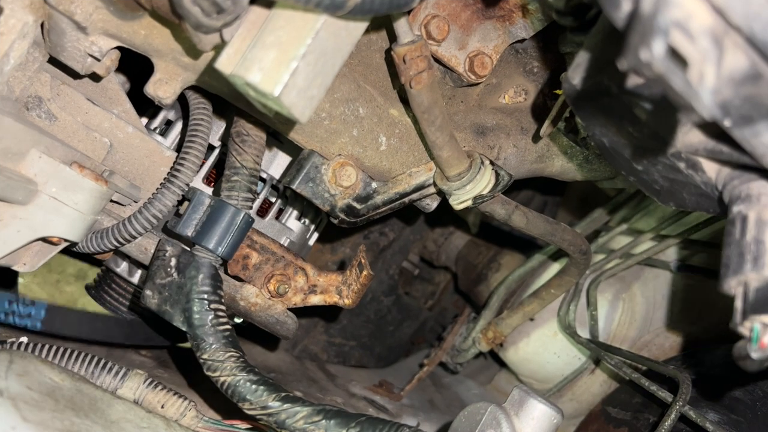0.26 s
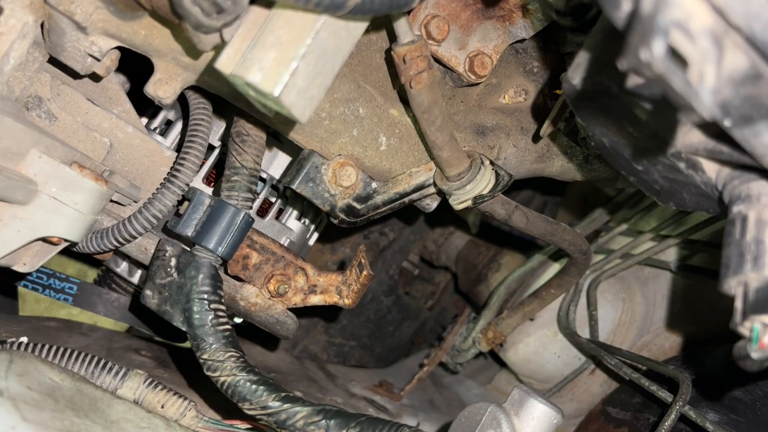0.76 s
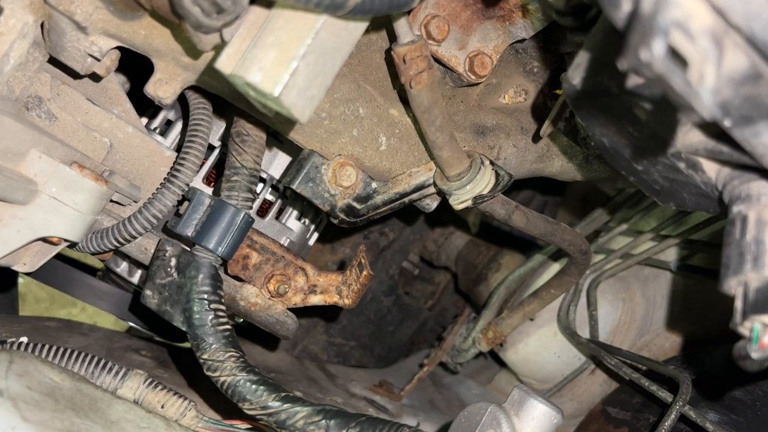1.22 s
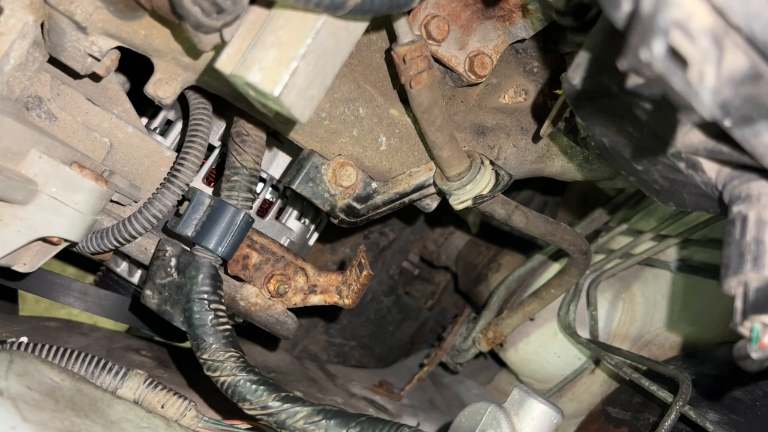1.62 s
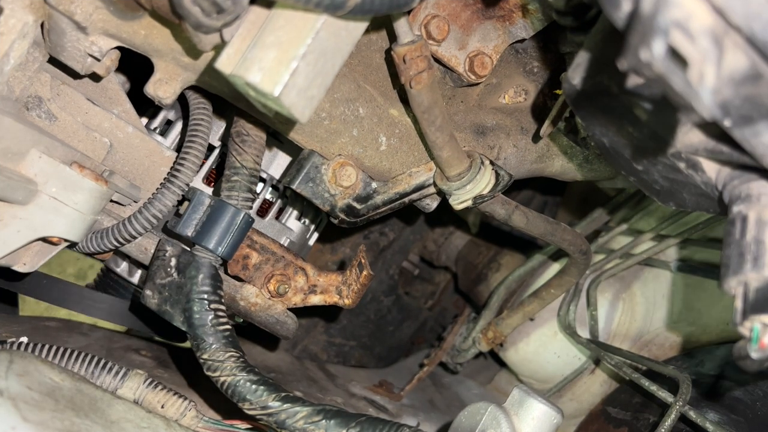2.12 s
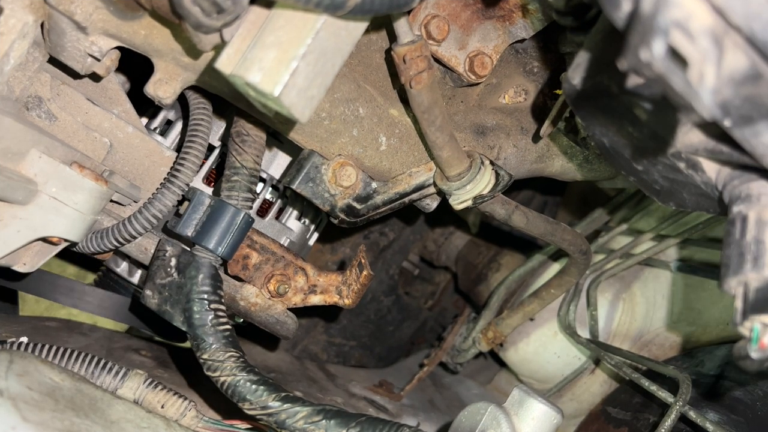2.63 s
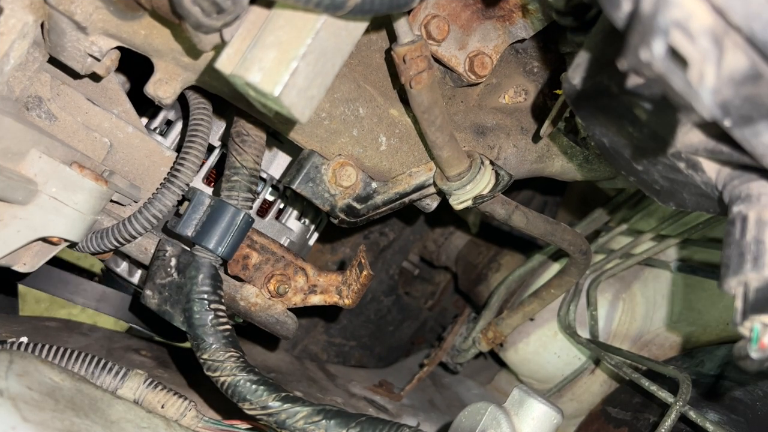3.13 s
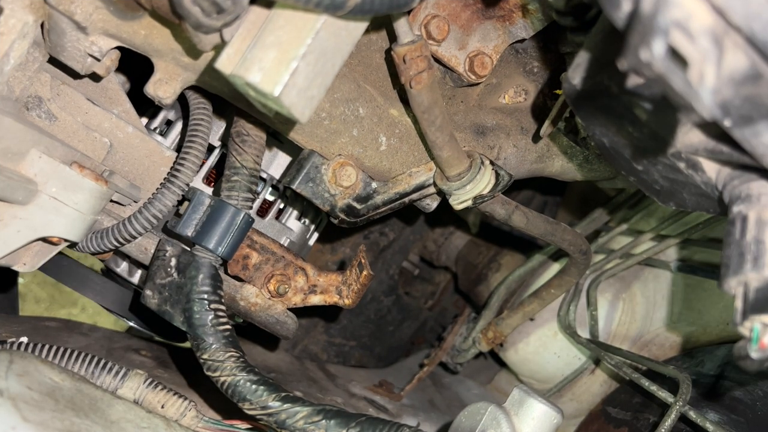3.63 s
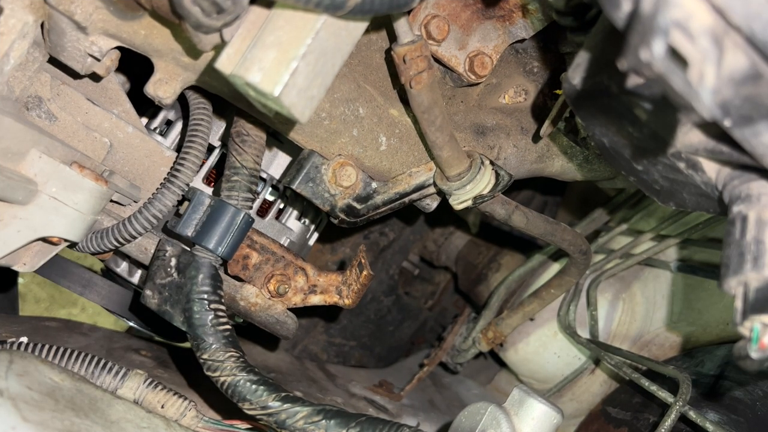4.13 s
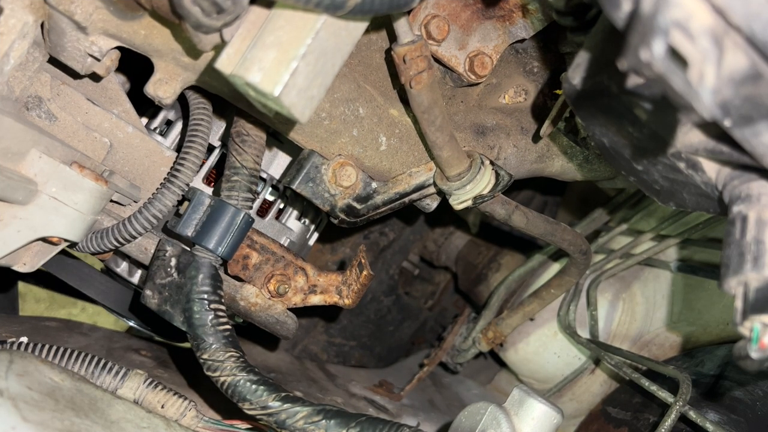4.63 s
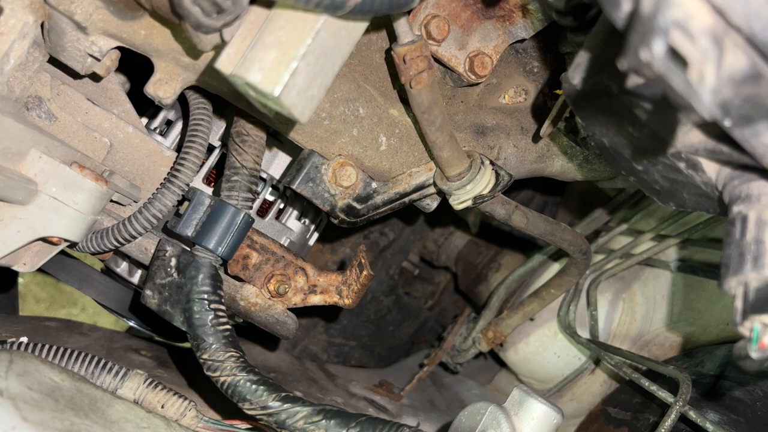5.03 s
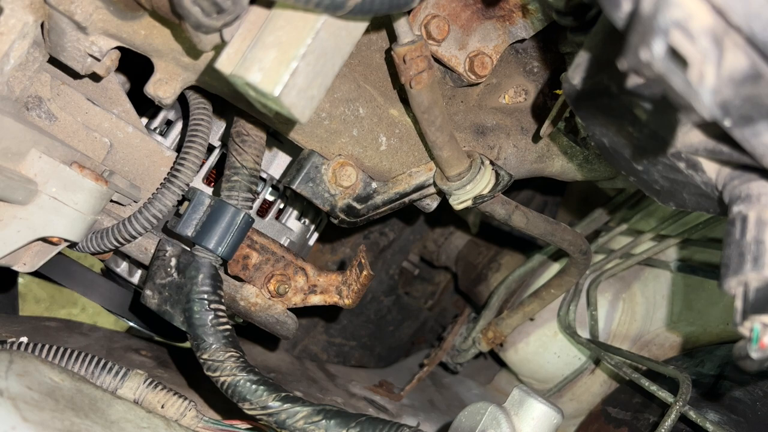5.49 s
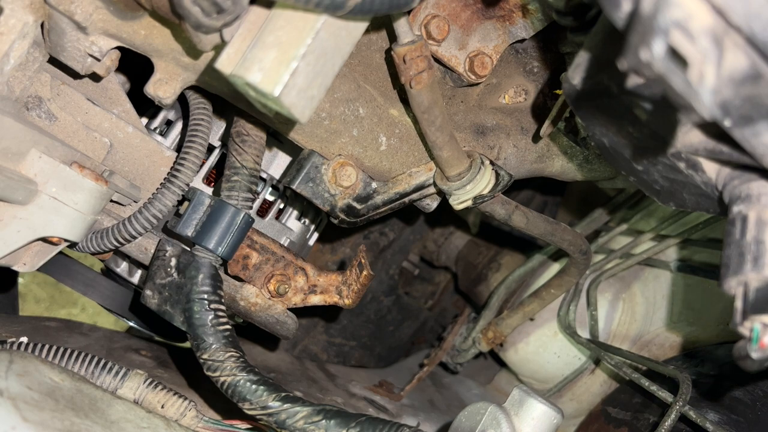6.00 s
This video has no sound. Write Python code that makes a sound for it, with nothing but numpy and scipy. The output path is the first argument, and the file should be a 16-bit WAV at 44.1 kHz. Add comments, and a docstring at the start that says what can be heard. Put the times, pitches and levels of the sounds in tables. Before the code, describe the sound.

A quiet garage with a faint low hum, heard closely in stereo within a cramped engine bay. At 0 s a dull bump and dry rubber hiss begin; around 0.15 s there is a short rasping scrape with small knocks. At 0.7 s a hard knock and click leave a brief thin metallic ping. From 0.9 to 1.45 s rubber rubs, judders and scrapes, ending in another ping. Soft sliding and limp thuds follow around 1.8-2.4 s. A stronger judder builds from 2.55 s into a hollow slap at 2.8 s. At 3.25-3.4 s come clustered rasps, clicks and a loud double slap. Another judder and scrape run from 3.7 to 3.95 s. The sharpest, loudest knock cracks at 4.43 s, with a weaker slap just after. Small judders and taps continue until 5.4 s, then only faint rustling and hum remain to about 6.3 s.

```python
"""First comes a dull bump with a dry hiss of rubber, over the low hum of a quiet garage.
A drive belt is being worked by hand onto its pulleys in an engine bay, heard at two microphone ports.
Irregular tiny slips make the belt hiss, judder, scrape and rasp; short pushes make it knock and slap.
Most contacts ring through one bank of damped resonances, the cramped bay; hoses and arms only thud.
Bright scatter from nearby metal and a faint garage tail follow the work."""
import sys
import numpy as np
from scipy import signal
from scipy.fft import rfft, irfft, next_fast_len
from scipy.io import wavfile

SR = 44100
rng = np.random.default_rng(int(sys.argv[2]) if len(sys.argv) > 2 else 0)


def digitize_waveform(pressure):
    """Quantize a signal to 16-bit integers and store it at the path in sys.argv[1].

    Rows of a 2-D input are taken as channels; values are limited to [-1, 1].
    """
    field = np.atleast_2d(pressure).T
    bounded = np.clip(field, -1, 1)
    quanta = np.round(bounded * 32767).astype(np.int16)
    wavfile.write(sys.argv[1], SR, quanta)


N = 275713
TIME = np.arange(N) / SR
GESTURE_TIME = TIME[:SR]   # no hand movement outlasts a second


def from_db(db):
    """Decibels to gain."""
    return 10 ** (np.asarray(db) / 20)


def rms_one(x):
    """Scale to unit power."""
    return x / np.sqrt(np.mean(x ** 2) + 1e-20)


def peak_one(x):
    """Scale to unit peak."""
    return x / np.abs(x).max()


def level(curve):
    """Gain over time from (t/s, level/dB) rows."""
    return from_db(np.interp(TIME, *np.transpose(curve)))


def at_hz(points, hz, axis=1):
    """Read one column of a table on a log-frequency axis."""
    points = np.array(points)
    return np.interp(np.log(np.maximum(hz, 1)), np.log(points[:, 0]), points[:, axis])


def colour(x, spectrum):
    """Give a steady signal a spectrum; unit power."""
    size = next_fast_len(x.shape[-1])
    hz = np.fft.rfftfreq(size, 1 / SR)
    shaped = irfft(rfft(x, size) * from_db(at_hz(spectrum, hz)), size)
    return rms_one(shaped[..., :x.shape[-1]])


def band(x, low_hz, high_hz):
    """Causal band-pass."""
    edges = [low_hz, min(high_hz, .45 * SR)]
    return signal.sosfilt(signal.butter(2, edges, "band", fs=SR, output="sos"), x)


def drift(rate):
    """Random wandering with a spread near one, with this many new values per second."""
    return np.interp(TIME * rate, np.arange(4096), rng.standard_normal(4096))


def slips(per_s, spread_db, size=N):
    """Tiny stick-slip releases at random moments, of uneven size and either sign; unit power."""
    unevenness = np.minimum(rng.exponential(1, size), 4)
    sizes = from_db(spread_db * unevenness) * rng.choice([-1, 1], size)
    return rms_one(sizes * (rng.random(size) < per_s / SR))


def add(track, s, sound):
    """Mix a short sound in at a time."""
    start = max(int(s * SR), 0)
    track[..., start:start + sound.shape[-1]] += sound[..., :N - start]


def gesture(length, attack_s, release_s):
    """Gain of one hand movement: a smooth attack, a hold and a dying release."""
    rise = np.sin(np.pi / 2 * np.minimum(GESTURE_TIME / attack_s, 1)) ** 2
    return rise * np.exp(-np.maximum(GESTURE_TIME - length, 0) / release_s)


def together(movements):
    """Gain over time from (start, gain) pairs; overlapping movements add in power."""
    power = np.zeros(N)
    for s, gain in movements:
        add(power, s, gain ** 2)
    return np.sqrt(power)


# the garage at rest, spectrum of its hum: f/Hz, relative level/dB
ROOM_COLOUR = [(20, -36), (35, -17), (50, -2.5), (75, -2.5), (110, -7.5), (180, -14.5), (300, -23.5),
               (600, -29.5), (2200, -38), (3000, -47), (8500, -58)]


def room_tone(hum_db=-61.5):
    """Low hum of the building, alike at both ports; its faint top is diffuse."""
    mid, side = from_db(hum_db) * colour(rng.standard_normal((2, N)), ROOM_COLOUR)
    return mid + band(side, 440, 16600) * [[.5], [-.5]]


# the garage's reverberation: f/Hz, time to die by 60 dB t60/s
GARAGE_DECAY = [(150, 0.47), (600, 0.15), (2000, 0.24), (6000, 0.2), (14000, 0.15)]


def reflections(x, near_db=-3.0, near_t60=0.026, near_low_hz=1300, far_db=-10.0, far_low_db=-4.5):
    """Bright scatter from nearby metal, then the garage's faint tail dying band by band."""
    t = TIME[:SR // 2]
    shared, left, right = rng.standard_normal((3, len(t)))
    scatter = band(shared + np.array([left, right]), near_low_hz, 15000)
    near = scatter * from_db(-60 * t / near_t60) * (t > .001)
    far, edges = 0, np.geomspace(80, 16000, 8)
    for low, high in zip(edges, edges[1:]):
        hz = np.sqrt(low * high)
        gain = from_db(far_low_db * (hz < 800) - 60 * t / at_hz(GARAGE_DECAY, hz))
        far = far + band(rng.standard_normal((2, len(t))), low, high) * gain * (t > .008)
    response = (from_db(near_db) * rms_one(near) + from_db(far_db) * rms_one(far)) / np.sqrt(len(t))
    return signal.fftconvolve(x, response, axes=1)[:, :N]


def moving_reflections(x, round_s=0.9, count=4):
    """The point of contact wanders, so patterns of reflections fade into one another in a round."""
    total = 0
    for k in range(count):
        share = np.maximum(np.cos(2 * np.pi * (TIME / round_s - k / count)), 0)
        total = total + reflections(x * share)
    return total


# the two microphone ports: f/Hz, left minus right level/dB, left's phase lead/rad
PORTS = [(80, 0, 0), (320, -5.5, -.35), (550, -3.5, -.5), (1100, -1, -1.3), (3000, 1.5, .5), (8000, 0, 1.4)]


def ports(x):
    """Direct sound reaches the two ports with a different level and phase."""
    size = next_fast_len(N + SR // 10)
    hz, side = np.fft.rfftfreq(size, 1 / SR), np.array([[.5], [-.5]])
    lead = np.exp(1j * side * at_hz(PORTS, hz, axis=2))
    response = from_db(side * at_hz(PORTS, hz, axis=1)) * lead
    return irfft(rfft(x, size) * response, size)[:, :N]


# higher ring of pulleys and brackets: f/Hz, width f/Hz, level/dB
METAL = [(1247, 290, -16), (1640, 40, -14), (1980, 73, -20), (2390, 180, -27), (2680, 66, -25),
         (3010, 63, -32.5), (3890, 68, -23), (5390, 67, -24.5), (8170, 720, -22.5)]


def metal(force, spread_db=0):
    """The high ring of the pulleys; each mode swings in a sense drawn at random."""
    sense = rng.choice([-1, 1], len(METAL))
    # at a spread of 0 dB all modes keep their levels
    shares = sense * from_db(spread_db * rng.standard_normal(len(METAL)))
    return sum(share * from_db(db) * resonance(force, hz, width)
               for share, (hz, width, db) in zip(shares, METAL))


def resonance(x, hz, width):
    """One damped mode, gain 1 at its top."""
    r = np.exp(-np.pi * width / SR)
    feedback = [1, -2 * r * np.cos(2 * np.pi * hz / SR), r * r]
    return (1 - r * r) / 2 * signal.lfilter([1, 0, -1], feedback, x)


# low resonances of belt, pulleys and the bay around them: f/Hz, width f/Hz, level/dB
MODES = [(217.5, 77, -14), (319.4, 28, -5.5), (446.3, 58, 2), (533.2, 53.6, 1), (685.2, 36.5, -2.5),
         (800, 66, -7), (944, 150, -7), (1160, 40, -7.5)]


def bay(force, broad_db=-29.5):
    """Neighbouring low modes swing in opposite senses, so a knock swells; the metal rings above them."""
    low = sum((-1) ** k * from_db(db) * resonance(force, hz, width)
              for k, (hz, width, db) in enumerate(MODES))
    # dense modes merge into a broad treble
    return low + metal(force) + from_db(broad_db) * band(force, 1100, 10000)


# hoses and arms bumping: t/s, level/dB
BUMPS = [(0.0, -49), (0.22, -60), (1.794, -51), (2.364, -50.5), (2.429, -52.5), (2.54, -50.5),
         (2.72, -51.5), (3.249, -46), (3.36, -51), (3.86, -66.5), (4.13, -54.5), (4.828, -50)]
# faint shuffling of the arms, which rest for a moment near the end: t/s, level/dB
SHUFFLE = [(0.0, -59.5), (2.9, -62), (5.2, -58.5), (5.33, -66), (5.8, -73), (6.25, -53.5)]
# dull spectrum of both: f/Hz, relative level/dB
BUMP_COLOUR = [(35, -14), (60, 4), (95, 3.5), (150, -5), (230, -5.5), (320, -3), (430, -11), (700, -22.5),
               (1500, -29.5), (6000, -84.5)]


def bumping(attack_s=0.0098, release_s=0.14):
    """Limp hoses and sleeves give dull thuds with no ring."""
    thuds = together((s, from_db(db) * gesture(attack_s, attack_s, release_s)) for s, db in BUMPS)
    return np.hypot(thuds, level(SHUFFLE)) * colour(slips(per_s=450, spread_db=3.5), BUMP_COLOUR)


# light strokes of belt and hands: t/s at the fastest, width t/s at half gain,
# level/dB before the trims of hiss and judder
SLIDES = [(-0, 0.12, -55.5), (0.139, 0.1, -59), (0.313, 0.14, -65.5), (0.442, 0.091, -59),
          (0.59, 0.16, -62.5), (1.208, 0.16, -59), (1.332, 0.085, -53.5), (1.509, 0.077, -61.5),
          (1.793, 0.19, -54), (1.905, 0.11, -54.5), (2.07, 0.17, -56), (2.22, 0.16, -60.5),
          (2.414, 0.085, -61.5), (2.59, 0.1, -56.5), (2.743, 0.12, -59.5), (2.878, 0.15, -63),
          (2.986, 0.1, -55), (3.067, 0.081, -54.5), (3.262, 0.036, -51), (3.395, 0.13, -53),
          (3.536, 0.083, -59), (3.717, 0.2, -59.5), (3.942, 0.072, -60), (4.313, 0.1, -62.5),
          (4.59, 0.044, -63), (4.736, 0.087, -59), (4.91, 0.29, -67.5), (5.095, 0.066, -63),
          (5.252, 0.044, -79), (5.58, 0.04, -61), (5.84, 0.1, -68.5), (5.998, 0.15, -61.5),
          (6.184, 0.11, -62.5)]


def slide_gain(shuffle_db=-72):
    """Each light stroke speeds up and slows down smoothly; the sliding between dies when the arms rest."""
    power = 0
    for s, length, db in SLIDES:
        halvings = np.minimum(2 * (2 * (TIME - s) / length) ** 2, 60)
        power = power + from_db(2 * db) * .5 ** halvings
    shuffle = level(SHUFFLE)
    busy = np.minimum(shuffle / shuffle.mean(), 1)
    return np.hypot(np.sqrt(power), from_db(shuffle_db) * busy ** 2)


# bright spectrum of the sliding rubber: f/Hz, relative level/dB
SLIDE_COLOUR = [(400, 5.5), (1300, -0.5), (2500, 2.5), (4500, 0), (6500, 4), (8900, 6.5), (9700, -2),
                (10500, -111.5)]


def sliding(strokes, trim_db=-0.85, apart=1.0, flutter_db=3.5, fine_db=-0.5, fine_follows=0.88):
    """Surface grain passing under the hands: a dense, bright rustle, finer as the stroke gets faster."""
    shared, left, right = [slips(per_s=8000, spread_db=2.0) for _ in range(3)]
    grain = shared + apart * np.array([left, right])
    # against the rustle, the finest grain drops fine_follows dB for each dB that a stroke is weaker
    fine = from_db(fine_db) * (strokes / strokes.max()) ** fine_follows
    rustle = colour(grain, SLIDE_COLOUR) + fine * rms_one(band(grain, 11000, 14600))
    return from_db(trim_db + flutter_db * drift(rate=47)) * strokes * rustle


# back of the belt dragging evenly over a pulley: t/s, length t/s, level/dB, lowest f/Hz
RUBS = [(0.92, 0.18, -53.5, 624), (1.15, 0.079, -48, 695), (2.63, 0.158, -50, 580)]


def rubbing(top_ratio=1.485, attack_s=0.065, release_s=0.0073, broad_db=-10.5):
    """Dense, even slips over some half an octave, with a weaker broad part that makes the pulley sing."""
    out = np.zeros(N)
    for s, length, db, low_hz in RUBS:
        grain = slips(per_s=6000, spread_db=-2.5, size=len(GESTURE_TIME))
        broad = from_db(broad_db) * band(grain, low_hz, 2440)
        force = band(grain, low_hz, top_ratio * low_hz) + broad
        add(out, s, from_db(db) * gesture(length, attack_s, release_s) * rms_one(bay(force)))
    return out


# belt edge scraping over rims and brackets: t/s, length t/s, body level/dB, treble gain/dB
SCRAPES = [(0.122, 0.034, -39.5, -9), (0.921, 0.35, -61, 14), (1.361, 0.11, -52, 4),
           (3.111, 0.0061, -55, -13), (3.461, 0.085, -54.5, 3.5), (3.85, 0.039, -51.5, 6),
           (3.953, 0.011, -59, 13.5), (4.565, 0.052, -57.5, 14.5), (4.813, 0.013, -55.5, 10.5),
           (5.193, 0.085, -65, 8), (5.458, 0.014, -70.5, 13.5)]
# spectrum of the scraping force: f/Hz, relative level/dB
SCRAPE_COLOUR = [(300, 4.5), (500, -8.5), (750, 0.5), (1100, -7.5), (2000, -6), (3600, -6.5), (5000, -4.5),
                 (12000, -16)]


def scraping(treble_hz=1400, attack_share=0.36, release_s=0.022):
    """Fast hard slips, each pass shaking the bay; a scrape speeds up over a share of its length."""
    out = np.zeros(N)
    lowpass = signal.butter(2, treble_hz, fs=SR, output="sos")
    for s, length, db, treble_db in SCRAPES:
        force = colour(slips(per_s=1200, spread_db=2.5, size=len(GESTURE_TIME)), SCRAPE_COLOUR)
        grit = rms_one(bay(force))
        body = signal.sosfiltfilt(lowpass, grit)
        heard = body + from_db(treble_db) * (grit - body)
        add(out, s, from_db(db) * gesture(length, attack_share * length, release_s) * heard)
    return out


# the belt's ribs rasping over a metal rim: t/s, length t/s, level/dB, crackle's lowest f/Hz, highest f/Hz
RASPS = [(0.134, 0.041, -42, 710, 2500), (1.367, 0.015, -50, 1410, 3300), (3.2772, 0.004, -41, 940, 2450),
         (3.361, 0.01, -46, 1680, 3550), (3.8495, 0.02, -50, 1280, 6230), (3.894, 0.0054, -50.5, 700, 2400)]


def rasping(catches_per_s=230, rough_db=5.0, attack_s=0.0036, release_s=0.0036, ring_db=2.5):
    """Hard slips clump unevenly as rib after rib catches and lets go; they crackle and shake the bay."""
    out = np.zeros(N)
    for s, length, db, low_hz, high_hz in RASPS:
        clumps = from_db(rough_db * np.clip(drift(catches_per_s), -2, 2))[:len(GESTURE_TIME)]
        grain = slips(per_s=2300, spread_db=2.0, size=len(GESTURE_TIME))
        crackle = band(clumps * grain, low_hz, high_hz)
        heard = rms_one(crackle) + from_db(ring_db) * rms_one(bay(crackle))
        add(out, s, from_db(db) * gesture(length, attack_s, release_s) * rms_one(heard))
    return out


# pulls on the belt, which judders harder until it gives: t/s, length t/s,
# final level/dB before the judder's trim, judder f/Hz
PULLS = [(0.0, 0.045, -50, 314), (0.99, 0.11, -49.5, 510), (1.183, 0.05, -47, 506), (1.32, 0.089, -41, 390),
         (1.79, 0.05, -50, 332), (1.95, 0.19, -66, 312), (2.358, 0.072, -57.5, 258),
         (2.566, 0.22, -36, 450), (3.225, 0.021, -35.5, 490), (3.732, 0.18, -40.5, 362),
         (4.58, 0.03, -49, 470), (4.778, 0.046, -43, 500), (4.862, 0.065, -52.5, 350),
         (4.954, 0.17, -47.5, 462), (5.168, 0.045, -47.5, 480)]
# spectrum of the judder under light strokes: f/Hz, relative level/dB
JUDDER_COLOUR = [(200, -27.5), (320, 6), (520, 2), (720, -19.5), (1100, -21.5), (2500, -22.5)]


def pulling(strokes, trim_db=-2.5, grip_db=-8.5, width_share=0.38,
            build_db_per_s=119.5, attack_s=0.043, release_s=0.011):
    """Tension builds in each pull as rubber slips unevenly around one pitch; light strokes grip a little."""
    grip = rms_one(bay(colour(slips(per_s=1200, spread_db=9.5), JUDDER_COLOUR)))
    out = from_db(grip_db) * strokes * grip
    for s, length, db, hz in PULLS:
        grain = slips(per_s=1800, spread_db=1.5, size=len(GESTURE_TIME))
        judder = rms_one(bay(resonance(grain, hz, width_share * hz)))
        build = from_db(db - build_db_per_s * np.maximum(length - GESTURE_TIME, 0))
        add(out, s, build * gesture(length, attack_s, release_s) * judder)
    return from_db(trim_db) * out


# a thin bracket is flicked and rings on: t/s, peak level/dB
PINGS = [(0.713, -37), (1.372, -50), (1.4292, -37), (2.787, -46.5)]
# the bracket's modes: f/Hz, width f/Hz, relative level/dB
BRACKET = [(1673, 20.3, -9), (2580, 140, -20.5)]


def pings():
    """One short tap leaves the bracket ringing on a nearly pure note."""
    out, tap = np.zeros(N), signal.unit_impulse(SR // 2)
    note = peak_one(sum(from_db(db) * resonance(tap, hz, width) for hz, width, db in BRACKET))
    for s, db in PINGS:
        add(out, s, from_db(db) * note)
    return out


# sharp clicks of hard parts touching: t/s, peak level/dB, crack's lowest f/Hz, highest f/Hz
CLICKS = [(0.31, -45, 670, 4400), (0.456, -44.5, 930, 2930), (0.597, -40, 5100, 14100),
          (0.715, -23.5, 3300, 5700), (0.7135, -20, 660, 1300), (0.716, -27, 1254, 1950),
          (1.3725, -36.5, 760, 1100), (1.4316, -49, 1780, 3640), (2.269, -37, 6100, 15500),
          (2.358, -45, 2950, 13900), (2.7876, -33, 1220, 10600), (3.2778, -28.5, 850, 8050),
          (3.2987, -35, 1190, 11900), (3.363, -31, 820, 1370), (3.8477, -33.5, 814, 3500),
          (3.854, -33, 1190, 10200), (4.4273, -17.5, 1780, 8140), (4.429, -21.5, 1500, 6500)]


def clicks(t60=0.011, apart=1.0, ring_db=28.0):
    """A crack of quickly damped noise, partly different at each port; it also sets the bay ringing."""
    out, t = np.zeros((2, N)), TIME[:SR // 12]
    for s, db, low_hz, high_hz in CLICKS:
        burst = rng.standard_normal((3, len(t))) * from_db(-60 * t / t60)
        crack, left, right = band(burst, low_hz, high_hz)
        heard = crack + apart * np.array([left, right]) + from_db(ring_db) * bay(crack)
        add(out, s, from_db(db) * peak_one(heard))
    return out


def push(t, hardness_hz):
    """Force of one contact, longer and duller when soft; a tiny floor keeps it above zero."""
    return t * np.exp(-2 * np.pi * hardness_hz * t) + 1e-18


# belt and pulley knocking against metal: t/s, peak level/dB, contact hardness f/Hz
KNOCKS = [(0.082, -40.5, 1500), (0.138, -44.5, 1540), (0.15, -39, 1500), (0.162, -30, 2510),
          (0.7129, -16.5, 1270), (1.087, -36.5, 900), (1.156, -36.5, 1500), (1.317, -35, 2800),
          (2.543, -44.5, 780), (3.884, -37.5, 1000), (4.4265, -11.5, 2720), (4.4869, -33, 1736),
          (4.808, -42, 694), (5.062, -49, 1900), (5.178, -50, 900), (5.355, -41, 576)]


def knocks():
    """Each blow is one push on the bay; soft rubber makes it long and favours the low resonances."""
    out, t = np.zeros(N), TIME[:SR // 6]
    for s, db, hardness_hz in KNOCKS:
        add(out, s, from_db(db) * peak_one(bay(push(t, hardness_hz))))
    return out


# belt slipping free and slapping into a groove: t/s, peak level/dB of the swing
SLAPS = [(2.726, -37.5), (2.786, -21), (3.25, -32.5), (3.326, -40), (3.3603, -15.5), (3.377, -18),
         (3.691, -32), (4.4278, -24), (4.486, -28.5), (4.674, -48.5), (5.266, -47.5)]


def slaps(span_hz=485.0, damping_hz=130.7, scatter=0.0047, land_s=0.0047, land_db=-24.0, hardness_hz=2200):
    """The freed span swings at a pitch set by tension, lands in the groove just after, shakes the bay."""
    out, t = np.zeros(N), TIME[:SR // 6]
    since = np.maximum(t - land_s, 0)
    landing = band(bay(push(since, hardness_hz)), 610, SR / 2)
    for (s, db), tension in zip(SLAPS, rng.standard_normal(len(SLAPS))):
        pitch_hz = span_hz * (1 + scatter * tension)
        swing = bay(np.sin(2 * np.pi * pitch_hz * t) * np.exp(-np.pi * damping_hz * t))
        add(out, s, from_db(db) * (peak_one(swing) + from_db(land_db) * peak_one(landing)))
    return out


def scene(slide_wet_db=-3.5):
    """Belt work, reflections and room; the light sliding is close and feeds the reflections less."""
    strokes = slide_gain()
    work = knocks() + slaps() + pulling(strokes) + rubbing() + scraping() + rasping()
    work = work + pings() + bumping() + clicks()
    hiss = sliding(strokes)
    wet = moving_reflections(work + from_db(slide_wet_db) * hiss)
    return ports(work + hiss) + wet + room_tone()


def record(dry, cutoff_hz=15900):
    """The top is cut steeply."""
    return signal.sosfilt(signal.ellip(10, .1, 80, cutoff_hz, fs=SR, output="sos"), dry)


dry = scene()
out = record(dry)
digitize_waveform(out)
```